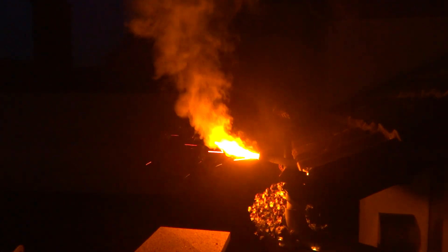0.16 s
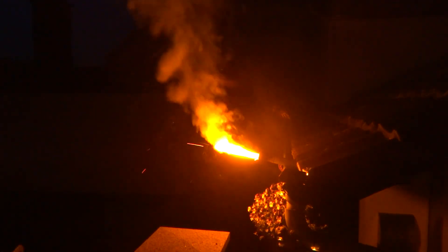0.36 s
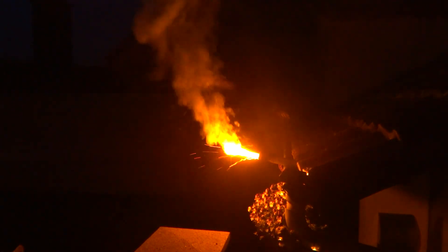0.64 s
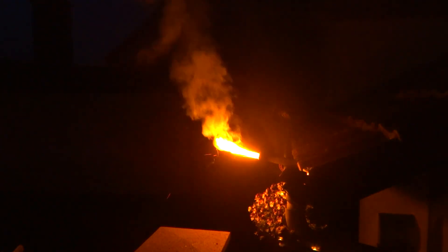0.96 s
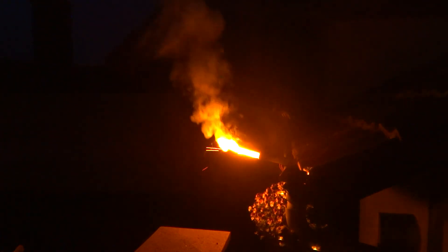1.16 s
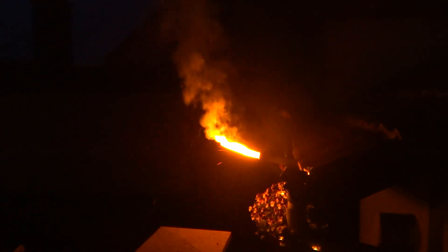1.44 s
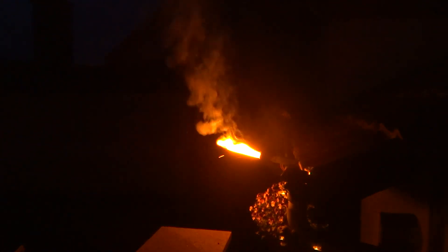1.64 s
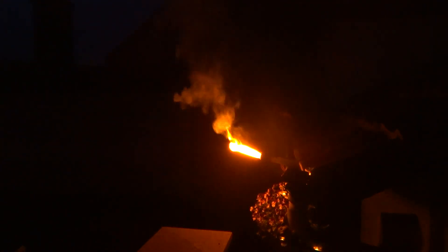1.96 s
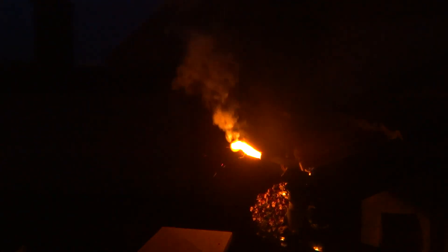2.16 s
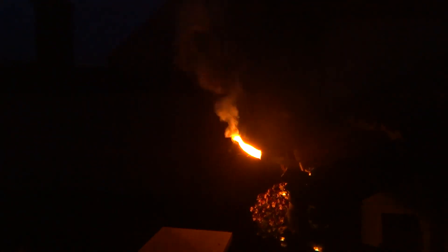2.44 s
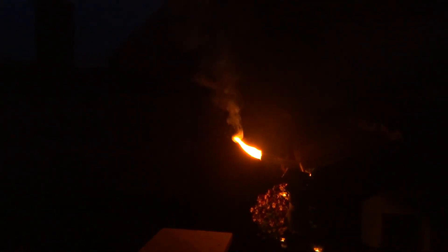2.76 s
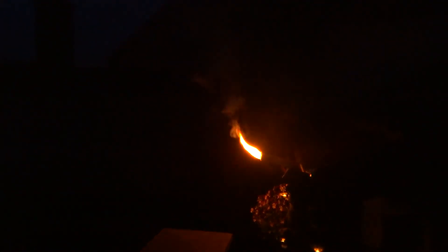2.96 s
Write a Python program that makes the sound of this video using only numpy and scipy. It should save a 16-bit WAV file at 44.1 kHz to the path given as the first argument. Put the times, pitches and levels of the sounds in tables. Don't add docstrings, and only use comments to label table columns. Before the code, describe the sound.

A flare burns with a dense crackling hiss and sharp pops, then weakens to sparse sputtering.

```python
import sys
import numpy as np
from scipy import signal
from scipy.fft import rfft, irfft
from scipy.io import wavfile
from scipy.ndimage import uniform_filter1d

SR = 44100
rng = np.random.default_rng(int(sys.argv[2]) if len(sys.argv) > 2 else 0)


def wrap_up_sound(samples):
    columns = np.atleast_2d(samples).T
    tamed = np.clip(columns, -1, 1)
    steps = np.round(tamed * 32767).astype(np.int16)
    wavfile.write(sys.argv[1], SR, steps)


def linear_from_db(decibels):
    return 10 ** (np.asarray(decibels, float) / 20)


N = 136710
FULL_DB = -22


def level(x, db):
    return x * linear_from_db(db) / np.sqrt(np.mean(x ** 2))


def band(x, hz, width):
    return signal.lfilter(*signal.iirpeak(hz, hz / width, fs=SR), x)


def low(x, hz):
    return signal.lfilter(*signal.butter(2, min(hz, .45 * SR), fs=SR), x)


def walk(rate):
    k = int(SR / rate)
    w = uniform_filter1d(uniform_filter1d(rng.standard_normal(N), k), k)
    return w / w.std()


def yard_hum():
    # (frequency [Hz], width [Hz], level [dB])
    modes = [(59, 57, -14), (109.6, 33, 0.5), (156.7, 9.8, 1.5), (180.1, 10.2, 1.5), (238.7, 24.5, 2),
             (291, 34, -2), (350, 33, -9), (387, 12, -24)]
    hum_db, swell_db, side_db = -33.5, 0.8, -32
    hum = np.zeros((2, N))
    for hz, width, db in modes:
        swell = linear_from_db(db + swell_db * walk(3.2))
        noise = rng.standard_normal((2, N))
        hum += swell * level(band(band(noise, hz, width), hz, 3 * width), 0)
    return level(hum, hum_db) * linear_from_db([[0], [side_db]])


def burn():
    # (time [s], level [dB])
    strength = [(0, -21), (.12, -21.5), (.35, -22), (.7, -22), (1.1, -22.5), (1.2, -23.5), (1.54, -23.5),
                (1.64, -24.5), (2.0, -26), (2.2, -27), (2.26, -25.8), (2.56, -28.3), (2.66, -28.8),
                (2.72, -28.6), (2.78, -26.8), (2.965, -28.5), (2.99, -29.5), (3.1, -31.5)]
    return np.interp(np.arange(N) / SR, *np.array(strength).T)


def flame_roar():
    air_db, air_hz, width_hz, side_db, follows = -48.5, 494, 780.0, 1.5, .9
    air = level(band(rng.standard_normal((2, N)), air_hz, width_hz), air_db)
    return air * linear_from_db(follows * (burn() - FULL_DB)) * linear_from_db([[0], [side_db]])


def yard_echoes(x):
    delays = [1.75, 2.06, 2.25, 5.07, 5.2, 12.73]
    strengths = [(.14, .01), (-.1, .01), (-.12, -.02), (.18, .01), (.06, -.01), (.2, -.05)]
    tail_db, t60_s, onset_s, tail_hz, side_db = -10, .12, .002, 6000, -13
    pan_db = -.9
    t = np.arange(int(.3 * SR)) / SR
    decay = np.exp(-np.log(1000) * t / t60_s) * np.clip(t / onset_s, 0, 1)
    ir = low(rng.standard_normal((2, len(t))) * decay, tail_hz)
    ir = ir / np.sqrt(np.sum(ir[0] ** 2)) * linear_from_db([[tail_db], [tail_db + side_db]])
    ir[0, 0] += 1
    for ms, shares in zip(delays, strengths):
        ir[:, round(ms * SR / 1000)] += shares
    mid, side = signal.fftconvolve(x[None], ir, axes=1)[:, :N]
    return np.array([mid, side + mid * np.tanh(pan_db * np.log(10) / 40)])


def colour(x):
    # (frequency [Hz], level [dB])
    spectrum = np.array([(150, -18), (450, -20), (850, -15.5), (1300, -10.5), (2100, -12.5), (3500, -9),
                         (5200, -14.5), (14000, -7)])
    # (frequency [Hz], width [Hz], gain [dB])
    peaks_and_dips = [(588, 23, 3), (800, 94, -4.5), (1200, 27, 2), (1290, 79, -4), (1501, 228, 8),
                      (1730, 28, 3), (2173, 120, -2.5), (4364, 560, 7), (5746, 140, 5), (6080, 150, -1.5),
                      (7780, 900, 4), (11100, 3900, 4.5), (13500, 750, -2)]
    top_hz, top_db_per_khz = 13780, -12
    f = np.linspace(1, SR / 2, 2049)
    db = np.interp(np.log(f), np.log(spectrum[:, 0]), spectrum[:, 1])
    for hz, width, gain in peaks_and_dips:
        db = db + gain / (1 + (2 * (f - hz) / width) ** 2)
    db = db + top_db_per_khz * np.clip((f - top_hz) / 1000, 0, 4)
    cepstrum = irfft(np.log(linear_from_db(db)))
    cepstrum[1:2048] *= 2
    cepstrum[2049:] = 0
    response = irfft(np.exp(rfft(cepstrum)))[:2048]
    return signal.fftconvolve(x, response)[:N]


def crackle(burn_db, clump_db):
    cracks_per_s, rate_per_db, spread_db, cap_db = 2600, .17, 4.5, 12
    hit, size, sign = rng.random((3, N))
    rate = cracks_per_s * np.exp(rate_per_db * (burn_db - FULL_DB)) * linear_from_db(clump_db)
    share = np.clip((rate / SR - hit) * 200 + .5, 0, 1)
    size_db = np.minimum(-spread_db * np.log(size + 1e-9), cap_db)
    x = share * np.sign(sign - .45) * linear_from_db(size_db)
    return x / np.sqrt(uniform_filter1d(x ** 2, int(.25 * SR)))


def pops(table):
    pop_db, suck, suck_lead = 1.2, .8, 2.5
    out, n = np.zeros(N + 200), np.arange(200)
    for (s, size_db, ms), toss in zip(table, rng.random(len(table))):
        softness = ms * SR / 1000
        pulse = np.exp(-n / (1.6 * softness))
        pulse = np.roll(pulse, round(2 + suck_lead * softness)) - suck * pulse
        pulse = pulse * np.sign(toss - .25)
        pulse = pulse / np.sqrt(np.sum(colour(pulse)[:14] ** 2))
        start = int(s * SR) - 4
        out[start:start + len(n)] += linear_from_db(pop_db + size_db) * pulse
    return out[:N]


def flare():
    # (time [s], size [dB], softness
    # [ms])
    single_pops = [(0.0421, -0.6, 0.013), (0.0559, 2.0, 0.014), (0.0966, -0.6, 0.023), (0.1014, 2.3, 0.014),
                   (0.1064, 1.1, 0.01), (0.1202, 0.8, 0.023), (0.1354, 1.4, 0.013), (0.1534, 2.5, 0.017),
                   (0.1874, 0.0, 0.017), (0.1901, 0.9, 0.01), (0.1929, -0.7, 0.026), (0.233, 0.9, 0.026),
                   (0.2559, 0.0, 0.019), (0.442, 0.9, 0.012), (0.462, 0.7, 0.011), (0.5168, -0.6, 0.013),
                   (0.6198, -0.7, 0.014), (0.6313, 1.3, 0.015), (0.6337, -0.6, 0.018), (0.7443, 1.7, 0.015),
                   (0.7543, 2.4, 0.025), (0.8176, -0.2, 0.019), (0.8268, -0.3, 0.013), (0.8413, 0.1, 0.008),
                   (0.908, 0.3, 0.014), (0.9655, -0.6, 0.016), (1.0073, -0.5, 0.018), (1.0178, -0.0, 0.021),
                   (1.0307, 0.1, 0.016), (1.0904, -0.2, 0.009),
                   (1.3014, -0.7, 0.021), (1.3601, -3.7, 0.017), (1.3711, -1.7, 0.017),
                   (1.3747, -3.2, 0.03), (1.3875, -1.9, 0.016), (1.3897, -2.9, 0.021), (1.4726, -2.4, 0.06),
                   (1.4776, -2.6, 0.036), (1.483, -1.0, 0.026), (1.491, -3.0, 0.031), (1.5177, -3.4, 0.046),
                   (1.5349, 1.1, 0.042), (1.5488, -3.3, 0.013), (1.6429, -2.5, 0.02), (1.6571, -1.2, 0.016),
                   (1.7067, 0.8, 0.019), (1.7249, -3.4, 0.027), (1.7422, -3.1, 0.017), (1.786, -2.5, 0.014),
                   (1.8103, -1.2, 0.026), (1.8913, -2.2, 0.026), (1.8958, -3.7, 0.025),
                   (1.9562, -2.8, 0.017), (1.9855, -1.9, 0.027), (2.0532, -2.2, 0.028),
                   (2.0745, -3.4, 0.02), (2.0976, 0.6, 0.026), (2.1801, -0.6, 0.013), (2.2435, 3.0, 0.018),
                   (2.2521, -0.2, 0.045),
                   (2.3044, -5.9, 0.02), (2.3087, -3.0, 0.02), (2.3462, 0.3, 0.021), (2.352, -2.8, 0.02),
                 (2.3582, -3.4, 0.014), (2.3873, -6.1, 0.045), (2.3894, -5.5, 0.023), (2.4237, -1.6, 0.017),
                 (2.4369, -5.9, 0.026), (2.4432, -4.8, 0.028), (2.4903, -0.7, 0.03), (2.5196, -0.7, 0.025),
                 (2.5695, -0.5, 0.022), (2.6185, -6.2, 0.019), (2.751, -5.4, 0.027), (2.756, -6.1, 0.01),
                 (2.7663, -4.8, 0.016), (2.7808, -4.6, 0.045), (2.787, -3.5, 0.024), (2.7921, -4.9, 0.017),
                 (2.8245, -0.8, 0.019), (2.8776, -0.8, 0.023), (2.9057, -5.4, 0.026), (2.9215, -2.8, 0.019),
                 (2.9299, -5.6, 0.017), (2.9449, -1.4, 0.016), (3.0011, -1.4, 0.023), (3.034, -5.8, 0.014),
                 (3.0575, -3.1, 0.018), (3.0597, -1.1, 0.011)]
    # (time [s], size [dB])
    small_ticks = [(2.5921, -9.1), (2.6011, -8.6), (2.604, -7.7), (2.6305, -6.6), (2.6941, -8.7),
                   (2.7108, -8.8), (2.7157, -7.3), (2.7236, -8.9), (2.745, -6.7), (2.7602, -7.4),
                   (2.7647, -8.7), (2.7779, -6.4), (2.801, -7.0), (2.8323, -6.6), (2.8376, -6.5),
                   (2.842, -6.8), (2.8438, -8.7), (2.8479, -9.2), (2.8549, -7.7), (2.8608, -6.6),
                   (2.8901, -9.7), (2.9331, -9.7), (2.9367, -9.8), (2.9639, -7.7), (3.0144, -9.2),
                   (3.0271, -7.8), (3.032, -9.6), (3.0649, -11.2), (3.0847, -9.4), (3.0951, -11.4),
                   (2.2706, -6.9), (2.2764, -10.2), (2.28, -5.3), (2.2859, -6.8), (2.2967, -9.2),
                   (2.3132, -10.7), (2.3151, -7.0), (2.3262, -10.0), (2.3407, -7.9), (2.3421, -10.8),
                   (2.3565, -9.7), (2.3617, -11.8), (2.391, -8.5), (2.402, -6.3), (2.4183, -12.3),
                   (2.4207, -7.9), (2.4339, -12.0), (2.4451, -10.1), (2.45, -12.0), (2.4557, -12.9),
                   (2.4575, -7.3), (2.4588, -9.5), (2.4674, -11.8), (2.4711, -11.9), (2.4819, -12.5),
                   (2.4835, -12.0), (2.4856, -10.0), (2.4992, -11.7), (2.5075, -11.0), (2.5089, -9.0),
                   (2.5286, -10.4), (2.5301, -11.2), (2.549, -8.5), (2.5542, -11.1), (2.5636, -9.1),
                   (2.5768, -11.2), (2.5786, -9.6), (2.5809, -12.4), (2.5955, -14.3), (2.6126, -13.7),
                   (2.6287, -15.2), (2.6688, -12.1), (2.6848, -13.3), (2.6905, -14.3), (2.7173, -14.4),
                   (2.7328, -14.9), (2.8188, -10.6), (2.8732, -11.8), (2.8813, -13.5), (2.8987, -12.8),
                   (2.9275, -14.5), (2.9313, -13.6), (2.9419, -12.1), (2.9713, -11.3), (3.0029, -13.9),
                   (3.0046, -14.8), (3.03, -15.1), (3.0437, -13.4), (3.056, -13.1), (3.0744, -13.2),
                   (0.0078, -1.0), (0.1405, -1.7), (0.1796, -1.2), (0.2446, -2.5), (0.3695, -1.7),
                  (0.3837, -2.2), (0.3993, -1.1), (0.4111, -1.9), (0.4691, -2.4), (0.4888, -2.5),
                  (0.4946, -1.7), (0.5671, -2.5), (0.5813, -2.0), (0.6268, -2.3), (0.6652, -1.6),
                  (0.668, -2.3), (0.9042, -3.0), (0.9146, -2.9), (0.9613, -1.1), (0.9869, -1.3),
                  (0.992, -2.3), (1.012, -1.4), (1.036, -2.8), (1.0814, -2.8), (1.0998, -2.9),
                  (1.1548, -2.9), (1.1865, -4.2), (1.1993, -4.3), (1.2239, -2.6), (1.2492, -5.0),
                  (1.2564, -3.7), (1.2739, -3.2), (1.2793, -5.1), (1.288, -4.8), (1.2899, -3.3),
                  (1.4087, -5.1), (1.5413, -4.7), (1.5811, -4.5), (1.679, -5.3), (1.7294, -5.6),
                  (1.8012, -4.7), (1.9044, -5.9), (1.9161, -6.5), (1.9385, -6.7), (1.968, -6.4),
                  (1.9804, -4.5), (1.9983, -6.6), (2.0165, -6.1), (2.0399, -4.5), (2.0841, -5.6),
                  (2.0881, -7.3), (2.1139, -4.9), (2.1354, -6.9), (2.1519, -7.4), (2.2017, -6.5),
                  (2.2061, -4.6), (2.2208, -4.3), (2.2325, -5.8)]
    clump_spread_db, clumps_per_s, fizz_db, tick_ms = 1.5, 148, -16.5, .018
    dulling, dulling_s = .55, .4
    dull_db, dull_hz, gas_db, gas_hz, gas_lingers = -0.5, 4500, -7, 2480, .22
    snap, last_ease_db = .6, -4.5

    burn_db = burn()
    clump_db = clump_spread_db * walk(clumps_per_s)
    fizz = linear_from_db(fizz_db) * rng.standard_normal(N)
    slow_burn_db = uniform_filter1d(burn_db, int(dulling_s * SR))
    bright = (crackle(burn_db, clump_db) + fizz) * linear_from_db(dulling * (slow_burn_db - FULL_DB))
    dull = level(low(crackle(burn_db, clump_db), dull_hz), dull_db)
    gas = level(low(rng.standard_normal(N), gas_hz), gas_db)
    gas = gas * linear_from_db(clump_db / 2 - gas_lingers * (burn_db - FULL_DB))
    jet = (bright + dull + gas) * linear_from_db(burn_db + 7.0)
    jet = signal.lfilter([-snap, 0, 1], [1, 0, -snap], jet)
    jet = jet * linear_from_db(last_ease_db * np.clip((np.arange(N) / SR - 2.25) / .5, 0, 1))
    ticks = [(s, db, tick_ms) for s, db in np.array(small_ticks)]
    return colour(jet + pops(np.vstack([single_pops, ticks])))


def scene():
    mid, side = yard_echoes(flare()) + yard_hum() + flame_roar()
    return np.array([mid + side, mid - side])


def top_cut(x):
    return signal.sosfilt(signal.butter(12, 15740, fs=SR, output="sos"), x)


def record(dry):
    side_top_hz, side_treble_db, low_cut_hz = 5700, -5, 50
    mid, side = (dry[0] + dry[1]) / 2, (dry[0] - dry[1]) / 2
    lows = signal.sosfiltfilt(signal.butter(6, side_top_hz, fs=SR, output="sos"), side)
    side = lows + linear_from_db(side_treble_db) * (side - lows)
    both = np.array([mid + side, mid - side])
    both = signal.lfilter(*signal.butter(2, low_cut_hz, "high", fs=SR), both)
    mix = np.tanh(both * 0.79) / .8
    return top_cut(mix)


dry = scene()
out = record(dry)
wrap_up_sound(out)
```